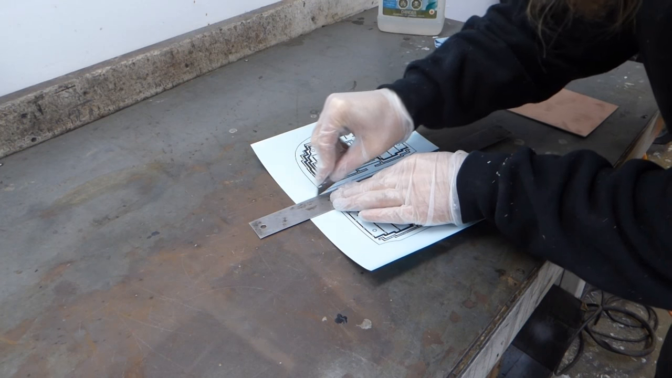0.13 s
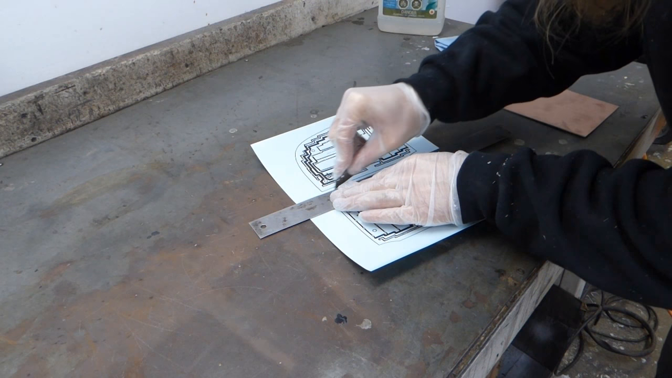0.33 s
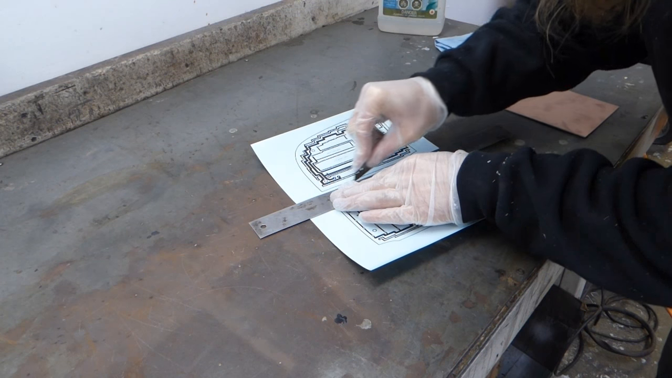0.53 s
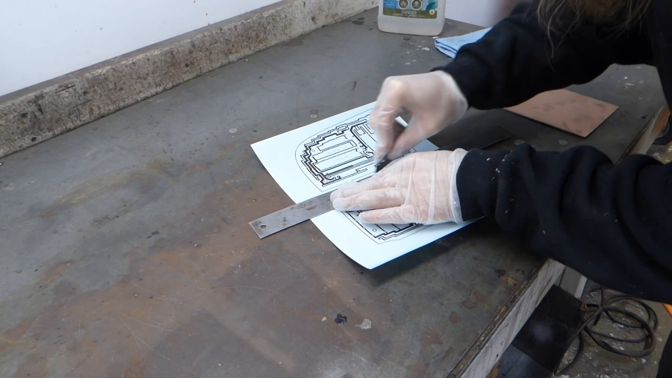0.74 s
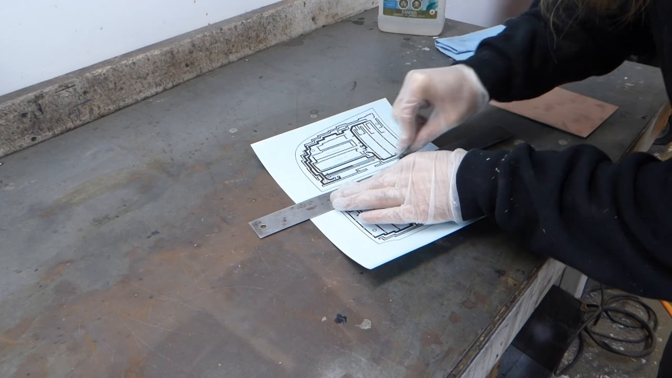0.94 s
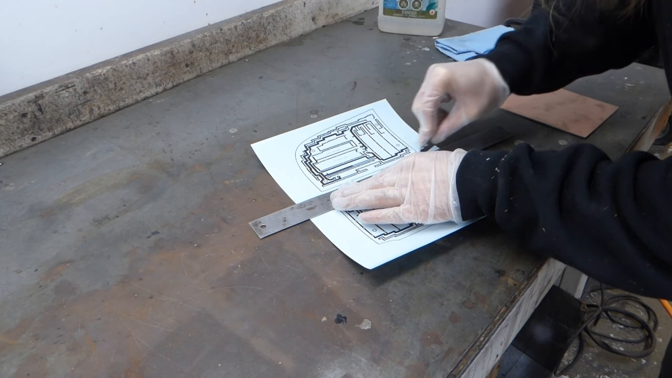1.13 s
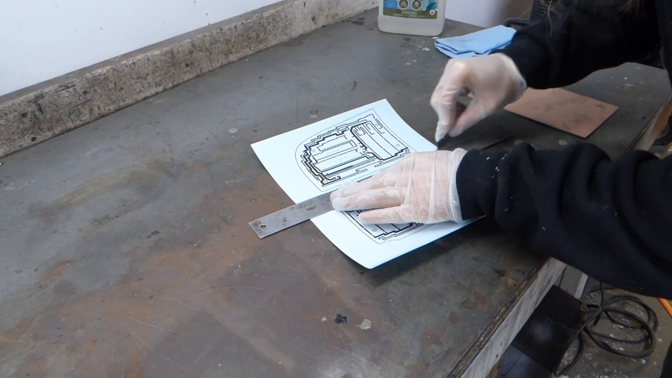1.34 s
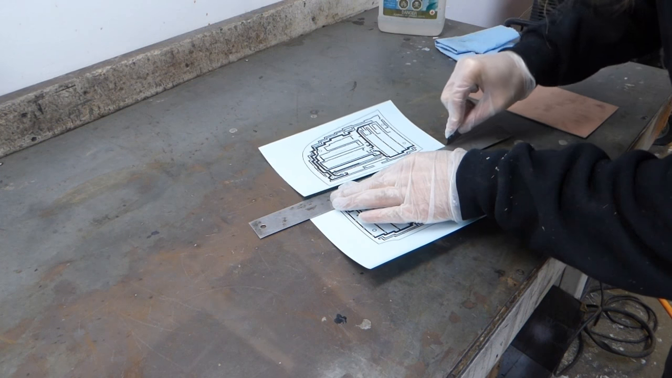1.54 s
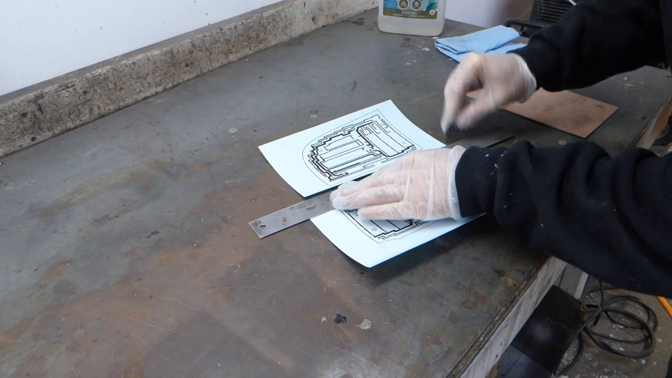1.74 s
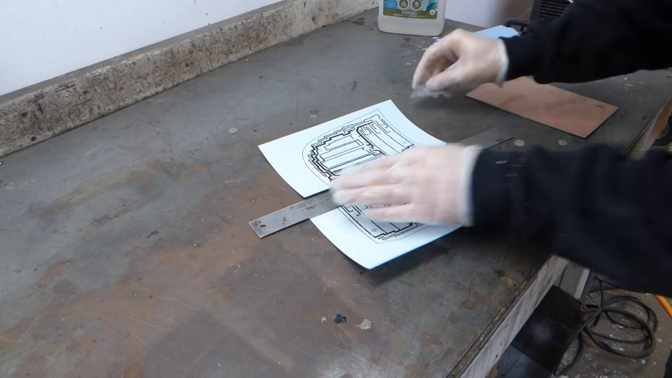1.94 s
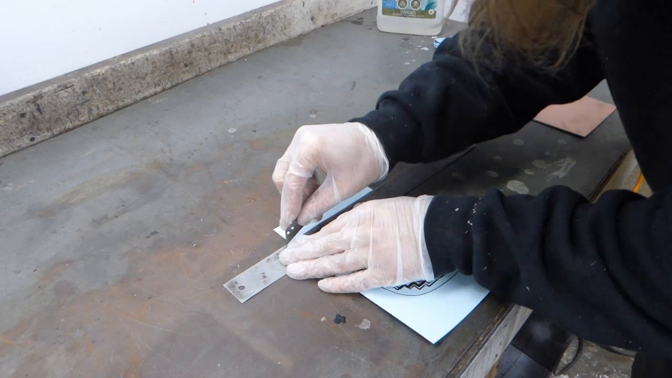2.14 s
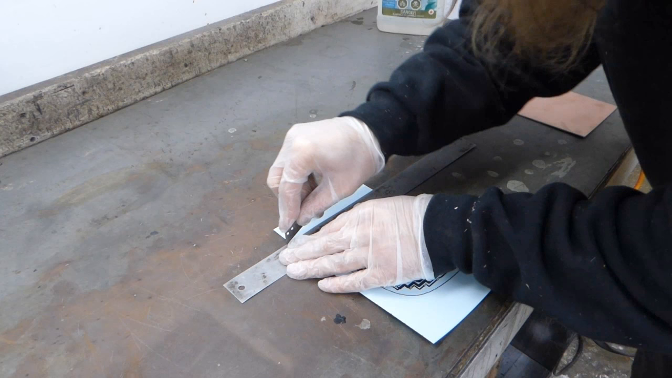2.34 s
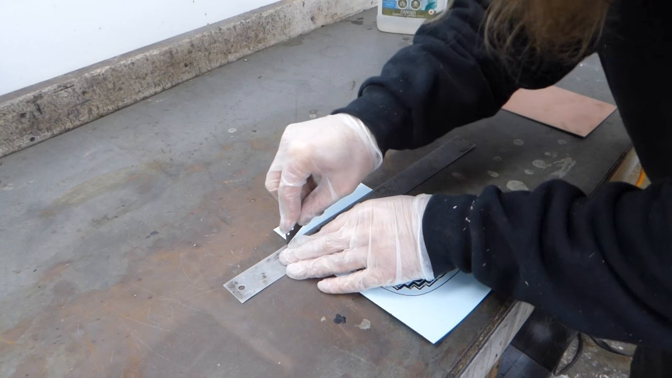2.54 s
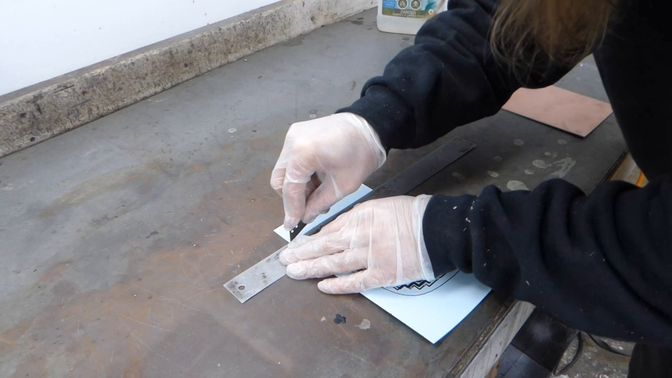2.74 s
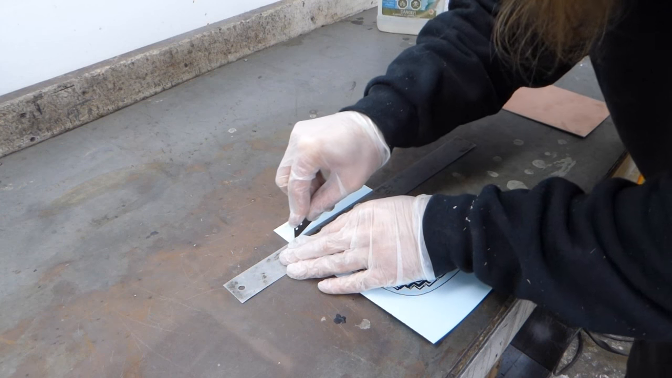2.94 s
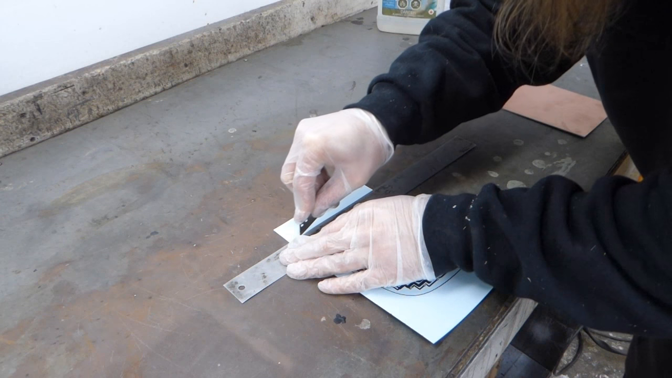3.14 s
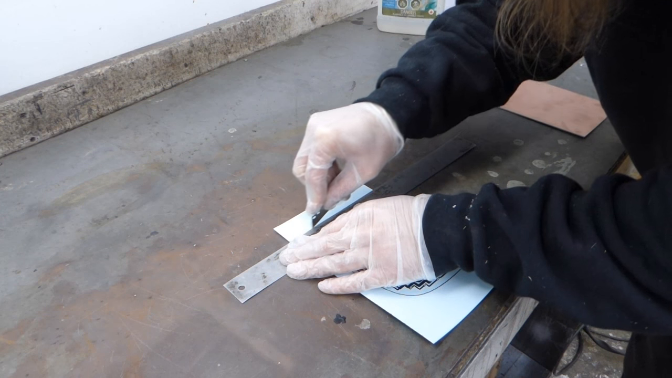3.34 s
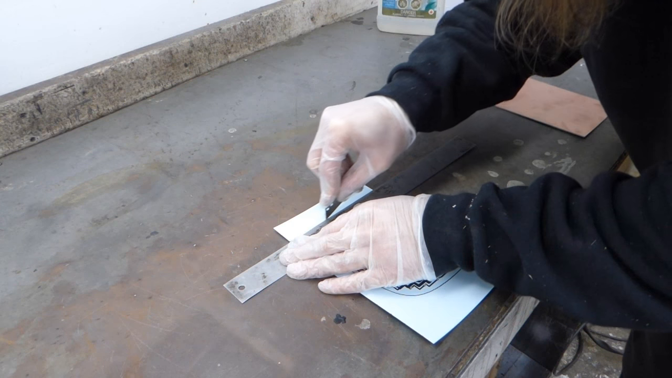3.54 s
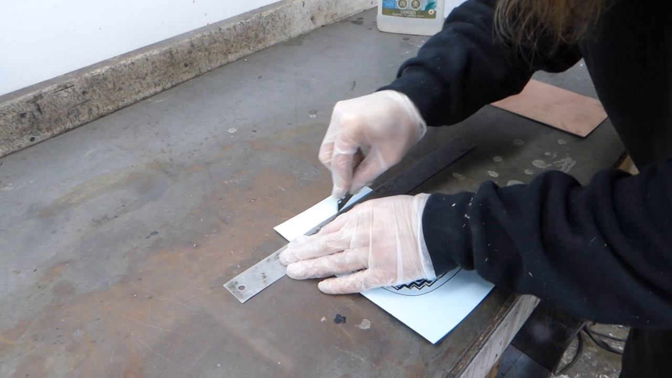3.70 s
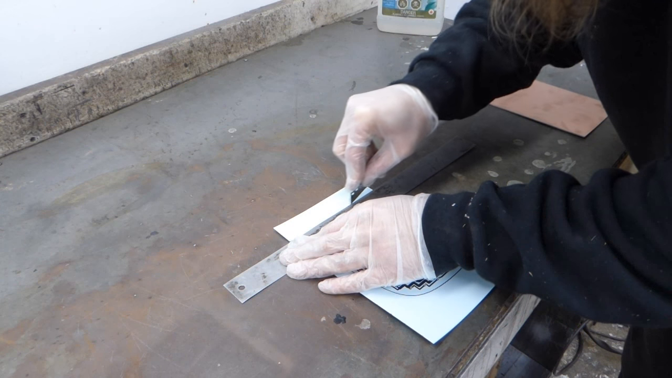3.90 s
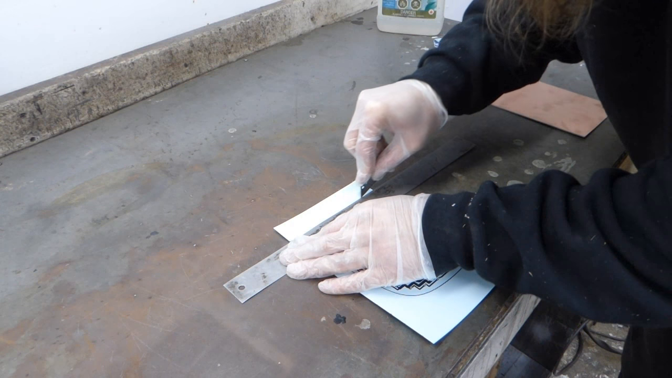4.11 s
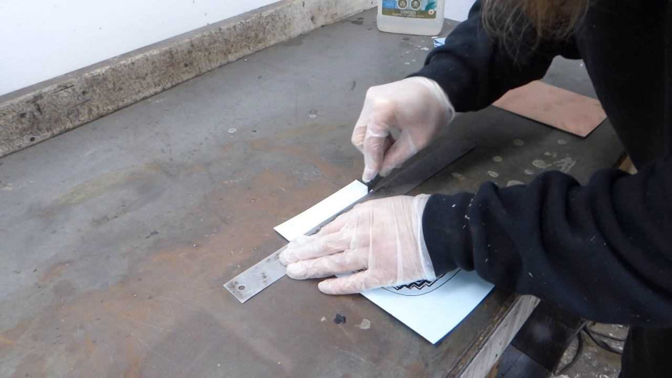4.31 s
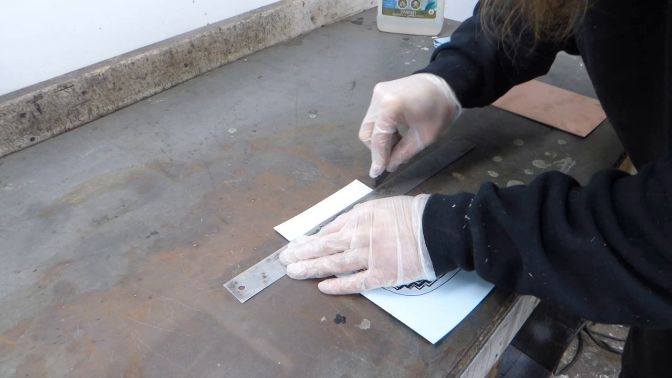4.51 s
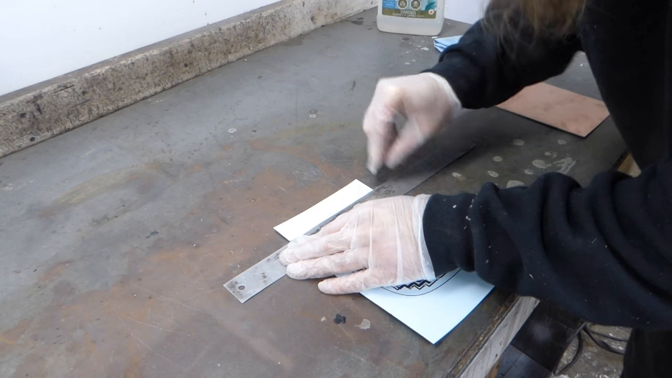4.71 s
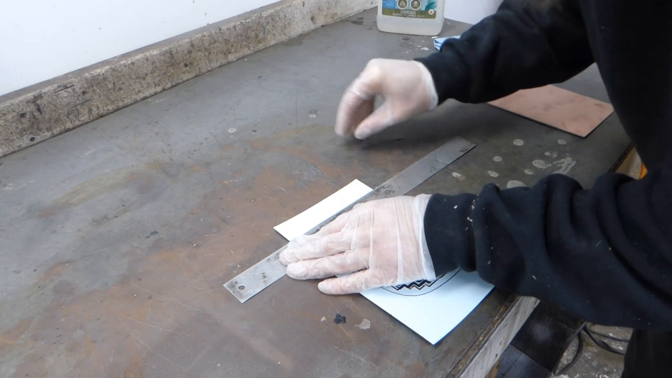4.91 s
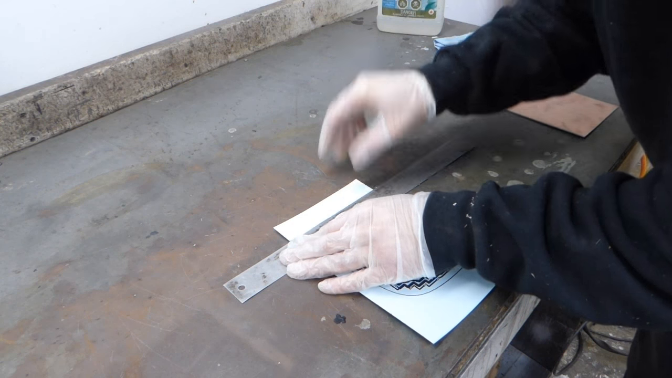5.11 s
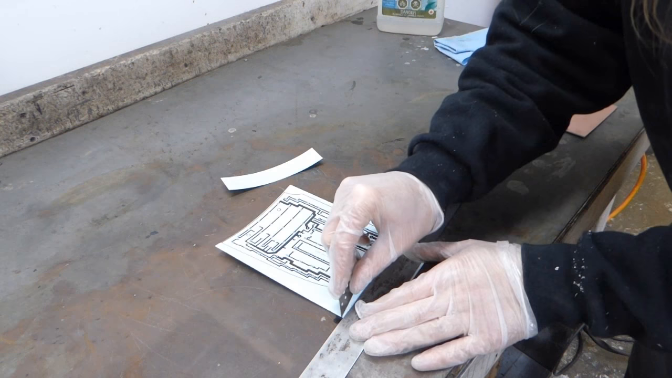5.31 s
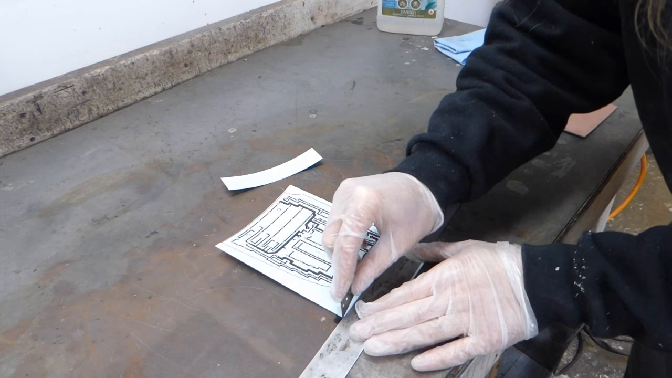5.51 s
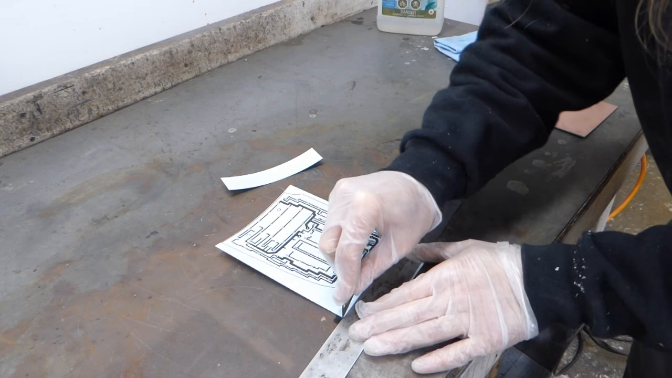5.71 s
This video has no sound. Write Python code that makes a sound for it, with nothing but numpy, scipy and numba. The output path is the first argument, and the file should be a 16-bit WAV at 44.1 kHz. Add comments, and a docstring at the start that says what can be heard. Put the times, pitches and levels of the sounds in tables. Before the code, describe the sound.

Two long rasping cuts of a knife against a metal ruler, a few handling ticks between them, and a crisp metallic tap near the end.

```python
"""Blade along a steel ruler

A blade is drawn along a steel ruler through paper on a workshop bench.
Its random slips ring the bench modes, make the sheet sing and are filtered into fibre hiss; noise bursts click,
and brief tones squeak high or sound once low and dull; the dropped blade gives a sharp tap of quick ticks and rings.
The bare room answers with a decaying noise tail, over a faint hiss. The close sound breaks off and restarts thrice.
"""
import sys
import numpy as np
from scipy import signal
from scipy.fft import rfft, irfft, next_fast_len
from scipy.io import wavfile
from scipy.ndimage import uniform_filter1d
from numba import njit

SR = 44100
rng = np.random.default_rng(int(sys.argv[2]) if len(sys.argv) > 2 else 0)


def dump_mix(stems):
    """Bounce the given channels to the path in sys.argv[1] as a 16-bit WAV at rate SR."""
    frames = np.atleast_2d(stems).T  # one column per channel
    limited = np.clip(frames, -1, 1)  # hard clip at full scale
    pcm = np.round(limited * 32767).astype(np.int16)
    wavfile.write(sys.argv[1], SR, pcm)


N = 258205  # length in samples


def undb(db):
    """Decibels to gain."""
    return 10 ** (np.asarray(db) / 20)


def unit(x):
    """Scale to rms 1."""
    return x / np.sqrt(np.mean(x ** 2))


def across(table, size):
    """A (Hz, value) table read at every bin of a transform."""
    hz, value = np.transpose([row for row in table if row[0] > 0])
    bins_hz = np.fft.rfftfreq(size, 1 / SR)
    return np.interp(np.log(bins_hz + 1), np.log(hz), value)


def colour(x, table):
    """Filter a sound by a (Hz, dB) curve."""
    length = x.shape[-1]
    size = next_fast_len(length)
    return irfft(rfft(x, size) * undb(across(table, size)), size)[..., :length]


@njit
def band(x, hz, width):
    """State-variable band-pass whose centre may move; gain 1 at the centre."""
    y, b, l = np.empty(len(x)), 0., 0.
    for i in range(len(x)):
        g, k = np.tan(np.pi * hz[i] / SR), width / hz[i]
        v = (b + g * (x[i] + 1e-18 - l)) / (1 + g * (g + k))
        b, l, y[i] = 2 * v - b, l + 2 * g * v, k * v
    return y


def fixed_band(x, hz, width_hz):
    """Band-pass with a steady centre."""
    return band(x, np.full(len(x), 1. * hz), 1. * max(width_hz, 5))


def walk(rate):
    """Random levels held 1 / rate s and slewed twice, at rms near 1."""
    hold = int(SR / rate)
    steps = np.repeat(rng.standard_normal(N // hold + 1), hold)
    return unit(uniform_filter1d(uniform_filter1d(steps, hold), hold)[:N])


def add(out, s, sound, pan_db):
    """Mix a short sound in at time s; pan_db is left minus right."""
    i = int(s * SR)
    sound = sound[:N - i]
    out[:, i:i + len(sound)] += sound * undb(np.array([[pan_db], [-pan_db]]) / 2)


def ring(push, modes):
    """A body rings in its (Hz, width, dB) modes; neighbours move in opposite sense."""
    out = 0
    for k, (hz, width, db) in enumerate(modes):
        out = out + (-1) ** k * undb(db) * fixed_band(push, hz, width) / np.sqrt(width)
    return out


RULER_DRIFT = .012  # share by which each mode wanders as the grip shifts


def patchy_ring(push, modes, pitch, patchy_db):
    """Modes scaled by a pitch factor that wander, and swell or fade one by one."""
    out = 0
    for k, (hz, width, db) in enumerate(modes):
        level = undb(db + patchy_db * walk(8))
        centre_hz = hz * pitch * (1 + RULER_DRIFT * walk(4))
        out = out + (-1) ** k * level * band(push, centre_hz, 1. * width) / np.sqrt(width)
    return out


def slips(rate, scatter_db, grip_db):
    """Tiny random slips of uneven size, rate per second; the grip wavers quickly."""
    happens = rng.random(N) < rate / SR
    size, scatter = rng.standard_normal((2, N))
    return unit(happens * size * undb(scatter_db * scatter + grip_db * walk(45)))


# the two long cuts, each a list of breakpoints; the rumble follows the pressure, the hiss the speed
# columns: time_s, rumble_db, hiss_db
CUTS = [
    [(0.0, -45, -56.5), (0.206, -40.5, -44), (0.392, -45.5, -47.5), (0.55, -40.5, -43.5), (0.718, -42, -47),
     (0.952, -42.5, -44), (1.076, -38, -46), (1.096, -42.5, -46.5), (1.148, -40, -42), (1.442, -45, -49),
     (1.46, -44.5, -47), (1.546, -45, -50), (1.69, -87, -99), (1.72, -105, -104)],
    [(3.0, -55, -70), (3.136, -41, -56.5), (3.14, -39, -46.5), (3.178, -42.5, -55.5), (3.43, -37.5, -46.5),
     (3.524, -41, -53.5), (3.536, -43.5, -52.5), (3.778, -38.5, -47), (3.886, -41.5, -49),
     (4.0, -35, -47.5), (4.252, -42.5, -56), (4.392, -43, -52.5), (4.508, -51.5, -60.5), (4.53, -44, -53)],
]
# deep rumble of each cut relative to its rumble; column: deep_re_rumble_db
CUT_DEEP_DB = [-9, -9]
# short shoves of hand, sheet and ruler
# columns: full_level_s, held_s, rumble_db, hiss_db, deep_re_rumble_db
SHOVES = [(1.753, 0.013, -58, -52, -13), (2.06, 0.0092, -71, -53.5, 0), (1.9, 0.0083, -75, -58.5, 3),
          (1.946, 0.028, -57.5, -55.5, -2.5), (2.61, 0.056, -41.5, -58, -4.5),
          (2.845, 0.0062, -43.5, -65, -9), (2.9, 0.062, -48, -58.5, -3.5), (4.546, 0.064, -36, -55.5, -15),
          (4.749, 0.075, -62, -57, -30), (5.2, .08, -45.5, -57.5, -0.5)]
SHOVE_RISE_DB_S, SHOVE_FALL_DB_S = 318.5, 193  # slopes in dB per second


def movements(t):
    """Each cut and shove as curves of rumble, hiss and deep rumble in dB; no shove lasts across a break."""
    for cut, deep_db in zip(CUTS, CUT_DEEP_DB):
        s, rumble_db, hiss_db = np.transpose(cut)
        rumble_db = np.interp(t, s, rumble_db, -200, -200)
        yield rumble_db, np.interp(t, s, hiss_db, -200, -200), rumble_db + deep_db
    for s, held_s, rumble_db, hiss_db, deep_db in SHOVES:
        rise_db = -SHOVE_RISE_DB_S * np.maximum(s - t, 0)
        fall_db = -SHOVE_FALL_DB_S * np.maximum(t - s - held_s, 0)
        same_stretch = np.digitize(t, BREAKS) == np.digitize(s, BREAKS)
        shape = np.where(same_stretch, rise_db + fall_db, -200)
        yield shape + rumble_db, shape + hiss_db, shape + rumble_db + deep_db


# two sheet notes that sink as the slit grows in the first cut, level relative to the hiss
# columns: time_s, level_re_hiss_db
SONG = [(0, -11), (.25, -1.5), (.45, -3.5), (.75, 7), (1.1, 1.5), (1.35, 2.5), (1.5, -20), (1.6, -35)]
# sheet resonances lit in turn as the notes sink past; columns: pitch_hz, width_hz, relative_level_db
SHEET_MODES = [(1900, 100, 1), (2100, 80, 2), (2350, 60, 3), (2630, 50, 7), (2800, 50, 0), (3250, 90, -1),
               (3520, 90, -1), (3700, 120, -3), (3950, 90, -3), (4200, 70, 0), (4450, 93, 1)]
SONG_HZ, SONG_SINK_HZ_S, SHEET_WIDTH_HZ = 3050, 680, 390.
OVERTONE_HZ, OVERTONE_SINK_HZ_S, SHEET_OVERTONE_WIDTH_HZ = 4550, 1050, 1300.
SHEET_OVERTONE_DB, SHEET_MODES_DB = -4, -10


def sheet_song(grit, t):
    """Slips drive two sinking resonances of the sheet, which in turn ring its fixed modes."""
    flex = 1 + 0.008 * walk(15)  # the sheet flexes, so the lower note wavers
    low_hz = np.maximum(SONG_HZ - SONG_SINK_HZ_S * t, 1000) * flex
    high_hz = np.maximum(OVERTONE_HZ - OVERTONE_SINK_HZ_S * t, 1000)
    low = unit(band(grit, low_hz, SHEET_WIDTH_HZ))
    high = band(grit, high_hz, SHEET_OVERTONE_WIDTH_HZ)
    high = unit(band(high, high_hz, SHEET_OVERTONE_WIDTH_HZ))
    song = unit(low + undb(SHEET_OVERTONE_DB) * high)
    return unit(song + undb(SHEET_MODES_DB) * unit(ring(song, SHEET_MODES)))


# bench top resonances; columns: pitch_hz, width_hz, relative_level_db
BENCH = [(230.6, 21.6, 0.5), (269.3, 37.6, 2), (304.5, 22, 3.5), (375.4, 19, -1.5), (413.2, 17, 3.5),
         (496, 64, 2), (568.6, 18, 1), (612.8, 13, -3), (687.3, 42, 3), (759, 72, -3.5), (866, 47, -5),
         (1020, 57, -36), (1290, 860, -9.5)]
# deep bench resonances, loud when the hand leans hard; columns: pitch_hz, width_hz, relative_level_db
BENCH_DEEP = [(60.7, 185, -23), (135.5, 30, -21), (170.8, 28, -3), (207, 34, -5.5)]
# spectrum of the rustling sheet; columns: pitch_hz, relative_level_per_hz_db
RUSTLE = [(530, -25.5), (900, 1.5), (1140, -2), (1310, -2.5), (1380, -5), (2330, -17.5), (6000, -23),
          (7800, -35), (13200, -120)]
# resonances of the rustling sheet; columns: pitch_hz, width_hz, relative_level_db
RUSTLE_MODES = [(878, 100, 4.5), (1103, 44, 4.5), (1277, 59, -3), (1705, 53, -6)]
# spectrum of the tearing fibres; columns: pitch_hz, relative_level_per_hz_db
FIBRES = [(2650, -7.5), (4500, -2.5), (5120, -6.5), (7050, 0), (8020, -2.5), (9710, -0.5), (13000, -17),
          (14700, -23), (15400, -33)]
# steel ruler under the scraping blade; columns: pitch_hz, width_hz, relative_level_db
RULER = [(5650, 300, -4), (6500, 120, 3), (7080, 160, 4), (7520, 120, -1), (8100, 150, -2), (8600, 200, 1),
         (9220, 150, -3), (9780, 150, -3)]
# ruler pitch in each stretch between breaks, as the hand holds it elsewhere; column: pitch_factor
RULER_PITCH = [1, .975, 1, 1]
# the contact shifts as the blade travels
# columns: time_s, upper_minus_lower_bench_db, rustle_change_db, ruler_change_db
TRAVEL = [(0, -2, -6, -15), (.2, -0.5, 4.5, -22), (.45, 5.5, -12.5, -13), (.62, 6, 1, -0.5),
          (.72, -1.5, 1.5, 1.5), (1.0, -9, 0.5, 1.5), (1.22, -5, 2.5, -0.5), (1.4, -11, 0.5, -8),
          (1.52, 2.5, 2, -21), (1.75, 9, 2.5, -20), (2.6, 6.5, -3, -7.5), (2.9, -4.5, 4.5, -14),
          (3.1, -4, 3, -6), (3.35, -1.5, -2.5, 1), (3.48, 1.5, 11.5, 6), (3.58, -0.5, 1.5, 2),
          (3.82, -1, 5.5, -4), (4.0, -1.5, -1, 1.5), (4.12, -3.5, 2, -14.5), (4.3, -6, -1, -22),
          (4.55, -3.5, 4.5, -19), (5.2, -12, -0.5, -8)]
BENCH_SPLIT_HZ = 340
UNSTEADY_DB, DEEP_UNSTEADY_DB = -0.3, 2.5  # the hand never leans evenly
RUSTLE_DB, RUSTLE_PRESSURE_SHARE = -10, 0.29  # the sheet rustles with both pressure and speed
RUSTLE_MODES_DB, RULER_DB = -5, -8
RULER_PATCHY_DB, RUSTLE_PATCHY_DB = 4.5, 4  # each mode comes and goes on its own
FLUTTER_DB = -1.42


def cutting():
    """Slips shake bench, sheet and tearing fibres; gives two pushes on the bench and airborne sound."""
    t = np.arange(N) / SR
    press, speed, lean = sum(undb(move) for move in movements(t))
    time_s, *shifts = np.transpose(TRAVEL)
    upper_db, rustle_db, ruler_db = (np.interp(t, time_s, column) for column in shifts)

    grit = slips(9000, 1.5, .8)
    singing = speed * undb(np.interp(t, *np.transpose(SONG), right=-200))
    song = singing * sheet_song(grit, t)

    rustling = undb(RUSTLE_DB + rustle_db) * press ** RUSTLE_PRESSURE_SHARE * speed ** (1 - RUSTLE_PRESSURE_SHARE)
    rustle_ring = unit(patchy_ring(grit, RUSTLE_MODES, np.ones(N), RUSTLE_PATCHY_DB))
    rustle = rustling * (unit(colour(grit, RUSTLE)) + undb(RUSTLE_MODES_DB) * rustle_ring)

    ruler_pitch = np.take(RULER_PITCH, np.digitize(t, BREAKS))
    ruler_ring = unit(patchy_ring(grit, RULER, ruler_pitch, RULER_PATCHY_DB))
    tearing = unit(colour(grit, FIBRES)) + undb(RULER_DB + ruler_db) * ruler_ring
    paper = (song + rustle + speed * unit(tearing)) * undb(FLUTTER_DB * walk(16))

    drag = slips(4500, 2, 1.3)
    # scale each push so that its modes ring at level 1
    rumble, deep = (drag / np.std(ring(drag, modes)) for modes in (BENCH, BENCH_DEEP))
    split = signal.butter(2, BENCH_SPLIT_HZ, "high", fs=SR, output="sos")
    upper = signal.sosfiltfilt(split, rumble)
    rumble = (rumble - upper) * undb(-upper_db / 2) + upper * undb(upper_db / 2)
    rumble = rumble * undb(UNSTEADY_DB * walk(23))
    deep = deep * undb(DEEP_UNSTEADY_DB * walk(20))
    return press * rumble, lean * deep, paper


def burst(length_ms):
    """A quick rattle that falls about 20 dB within its length, cut off at 46 ms."""
    t = np.arange(2048) / SR / (max(length_ms, .3) / 1000)
    return rng.standard_normal(2048) * np.minimum(t / 0.041, 1) * np.exp(-2.3 * t ** 1.1)


def blow(out, s, db, length_ms, pan_db, tint):
    """Add a coloured rattle as heard directly; gives back its size."""
    sound = tint(burst(length_ms))
    sound = undb(db) * sound / np.abs(sound).max()
    add(out, s, sound, pan_db)
    return np.linalg.norm(sound)


def knock(out, s, size, tint):
    """Add one evenly coloured push: a rattle as blade and walls get it, averaged over all sides."""
    even = tint(signal.unit_impulse(2048, 128))
    add(out, s, size * even / np.linalg.norm(even), 0)


def thump(out, s, db, length_ms):
    """Add a push on the bench, scaled by the peak of the ringing it causes."""
    push = burst(length_ms)
    add(out, s, undb(db) * push / np.abs(ring(push, BENCH)).max(), 0)


# small clicks; columns: start_s, peak_db, colour_hz, length_ms, thump_re_peak_db
CLICKS = [(0.588, -26, 3480, 17, -9), (1.4584, -32, 3520, 13, -28), (1.7355, -54, 3010, 6.4, -38),
          (1.7483, -44, 3080, 7.5, -16), (1.752, -59, 640, 22, -11), (1.7590, -32.5, 4020, 4, -25),
          (1.9369, -37.5, 3000, 11, -9), (1.945, -37, 2440, 15, -5.5), (2.0552, -30, 3800, 9, -13),
          (2.0631, -33, 8000, 14, -30), (2.0640, -35.5, 700, 6.8, -17), (2.0733, -33, 2300, 10, -37),
          (2.0812, -27.5, 4650, 3.1, -39), (2.098, -38, 3000, 5.9, -26), (2.119, -42, 2300, 10, -24),
          (2.13, -44, 5800, 12, -25), (2.373, -34.5, 5000, 18, -14), (2.3926, -44, 6300, 13, -16),
          (2.536, -48.5, 5170, 5.5, -5), (2.6776, -45, 3210, 12, 9), (2.851, -43.5, 6770, 11, 5),
          (2.8899, -31, 2840, 13.6, -4), (2.9165, -40, 2160, 14, 2), (3.083, -44.5, 6820, 8.8, 7.5),
          (3.14, -37, 6000, 14, -16), (3.988, -32, 5060, 10, -22), (4.096, -37, 7170, 17, -13),
          (4.1284, -47.5, 7220, 5, 16), (4.1683, -38, 3270, 21, -20), (4.2772, -32.5, 3410, 7.4, 4),
          (4.5192, -45, 4500, 13, -10.5), (4.745, -32, 9000, 14, -10), (5.2, -44.5, 4000, 8.1, 1),
          (5.229, -40.5, 7700, 20, -26), (5.252, -45, 8540, 7.7, -15), (5.268, -49, 5180, 8, -8),
          (5.3435, -52, 5960, 9.2, -6), (5.47, -54, 4190, 8, -11)]
CLICK_WIDTH, CLICK_PAN_DB, CLICK_TOP_HZ = 1.86, 0.5, 10500  # width as a multiple of the colour pitch


def clicks(thumps, direct, ticks):
    """Short rattles in a wide band, each with a thump on the bench."""
    dull = signal.butter(4, CLICK_TOP_HZ, fs=SR, output="sos")
    for s, db, hz, length_ms, thump_db in CLICKS:
        width = hz * CLICK_WIDTH
        tint = lambda x: signal.sosfilt(dull, fixed_band(fixed_band(x, hz, width), hz, width))
        knock(ticks, s, blow(direct, s, db, length_ms, CLICK_PAN_DB, tint), tint)
        thump(thumps, s, db + thump_db, length_ms)


# a sharp tap: a faint soft onset, then a quick volley of bright ticks and weaker bounces; levels before TAP_DB
# columns: start_s, relative_peak_db, length_ms, left_minus_right_db
TAP = [(4.9192, -22, 3, 1), (4.9208, -3.5, 2, 0), (4.9221, -5, 2, 1), (4.9235, -3.5, 2, 6),
       (4.9256, -8, 2.5, 6), (4.9272, -10, 2.5, 6), (4.9365, -22, 4, 3), (4.9465, -23, 4, 3),
       (4.9730, -25, 5, 3), (4.9890, -28, 5, 3), (4.9575, -20, 6, 3)]
# spectrum of the tap; columns: pitch_hz, relative_level_db
TAP_COLOUR = [(300, -22), (650, -21), (950, -17), (1400, -20), (2200, -13.5), (4770, -10), (7970, -3),
              (12500, -8), (13200, -16), (15500, -24)]
# how much fuller the tap is averaged over all sides than direct; columns: pitch_hz, boost_db
TAP_SPREAD = [(300, 4), (700, 8), (1400, 8), (2500, 2), (6000, 0), (12500, 0), (14000, 4)]
TAP_DB, TAP_LOW_HZ = -1, 350
TAP_THUMP_DB, TAP_THUMP_MS = -32, 94
BOUNCE_RING_DB = 6.5  # the late bounce catches the blade's edge


def dropped_blade_tap(thumps, direct, tap):
    """A faint onset, bright ticks, weaker bounces and one bench thump; two pushes excite the steel."""
    thin = signal.butter(3, TAP_LOW_HZ, "high", fs=SR, output="sos")
    tint = lambda x: signal.sosfilt(thin, colour(x, TAP_COLOUR))
    spread = lambda x: colour(tint(x), TAP_SPREAD)
    thump(thumps, TAP[5][0], TAP_THUMP_DB, TAP_THUMP_MS)
    sizes = [blow(direct, s, db + TAP_DB, length_ms, pan_db, tint) for s, db, length_ms, pan_db in TAP]
    # one push with the energy of the whole tap, one for the late bounce
    knock(tap, TAP[1][0], np.linalg.norm(sizes), spread)
    knock(tap, TAP[-1][0], undb(BOUNCE_RING_DB) * sizes[-1], tint)


CLICK_RING_DB, CLICK_ROOM_DB, TAP_ROOM_DB = -6.5, 1, 2.5


def clicks_and_tap():
    """Clicks and tap together: bench thumps, direct rattles, what rings the blade, what reaches the walls."""
    thumps, direct, ticks, tap = np.zeros((4, 2, N))
    clicks(thumps, direct, ticks)
    dropped_blade_tap(thumps, direct, tap)
    strikes = undb(CLICK_RING_DB) * ticks + tap
    wall = undb(CLICK_ROOM_DB) * ticks + undb(TAP_ROOM_DB) * tap
    return thumps[0], direct, strikes, wall[0]


# brief unsteady tones: high squeaks and one low, dull tone; levels before TONE_DB
# columns: start_s, length_ms, pitch_hz, relative_level_db, wall_send_db
BRIEF_TONES = [(1.737, 22, 3050, -43, -3), (1.738, 15, 4600, -47, -1), (1.747, 32, 630, -39, -5),
               (1.754, 14, 3000, -35, -5), (1.758, 16, 2800, -39, -1), (1.944, 10, 3000, -43, -4),
               (1.944, 12, 2550, -42, -4), (2.055, 22, 6150, -35, -2), (2.072, 12, 2150, -44, 0),
               (2.073, 16, 4650, -40, -3), (2.058, 15, 11690, -38, -20), (2.0600, 12, 13450, -46, -20),
               (2.0615, 12, 8380, -27, -22)]
TONE_DB = -4
TONE_ROUGH = .12  # radians by which the tone's phase strays each sample


def brief_tones():
    """Sines of straying phase that swell and stop, direct and as sent to the walls."""
    out, wall = np.zeros((2, 2, N))
    for s, length_ms, hz, db, room_db in BRIEF_TONES:
        t = np.arange(int(length_ms * SR / 1000)) / SR
        waver = np.cumsum(rng.standard_normal(2048))[:len(t)]
        swell = np.abs(np.sin(np.pi * t / t[-1])) ** 0.18
        tone = undb(db + TONE_DB) * swell * np.sin(2 * np.pi * hz * t + TONE_ROUGH * waver)
        add(out, s, tone, 0)
        add(wall, s, undb(room_db) * tone, 0)
    return out, wall[0]


# blade resonances, levels before BLADE_DB; columns: pitch_hz, relative_level_db, t60_s
BLADE = [(710, -14, .25), (950, 3, 0.03), (2400, -14, .35), (3100, -2, .03), (5800, -6, .1), (6225, 0, 0.2),
         (6820, -13, .3), (7100, 3, .04), (8420, -9, .2), (9500, 6, .035), (9980, -12, .25),
         (11690, -4, .15), (12400, 1, .02), (13380, -2, .2), (13800, -3, .16), (14380, 0, .15)]
BLADE_DB = -40


def blade(blows):
    """Each blow leaves the thin steel ringing in decaying sine modes."""
    out = 0
    for hz, db, t60 in BLADE:
        pole = np.exp(2j * np.pi * hz / SR - np.log(1000) / (t60 * SR))
        out = out + undb(db + BLADE_DB) * signal.lfilter([1], [1, -pole], blows).imag
    return out


# room decay by band; columns: pitch_hz, t60_s, left_right_correlation (no unit)
ROOM = [(135, 0.49, 1), (221, 0.74, 1), (470, 0.72, 1), (1170, 0.5, 0.05), (2300, 0.84, 0.83),
        (3850, 0.55, 0.067), (7860, 0.22, 0.061), (13700, 0.31, 0.047)]
ROOM_DB, ROOM_GAP_MS = -6, 1.22  # the tail swells in over the gap


def room():
    """Diffuse tail: wide bands of noise, each fading at its own rate and partly alike left and right."""
    t, tail = np.arange(SR) / SR, 0
    for hz, t60, like in ROOM:
        mid, side = (fixed_band(rng.standard_normal(SR), hz, hz) for _ in range(2))
        both = np.sqrt(1 + like) * mid + np.sqrt(1 - like) * side * np.array([[1], [-1]])
        tail = tail + both * 1000 ** (-t / t60) / (hz / 1000) ** 0.0074
    tail = tail * np.clip(t * 1000 / ROOM_GAP_MS, 0, 1) ** 2
    tail = tail * undb(4.3 * np.exp(-t / 0.099))  # near walls crowd the first echoes
    return undb(ROOM_DB) * tail / np.sqrt(np.sum(tail ** 2) / 2)


# hiss spectrum common to both channels; columns: pitch_hz, relative_level_per_hz_db
HISS = [(15, -53), (25, -24), (55, -24), (266, -10), (305, -10), (388, -13.5), (740, -15.5), (1020, -18.5),
        (1410, -19.5), (2290, -23), (15400, -29.5)]
# hiss spectrum added left and subtracted right; columns: pitch_hz, relative_level_per_hz_db
HISS_SIDE = [(15, -45), (25, -8), (101, -23), (140, -10), (215, -14), (259, -4), (399, -21), (444, -3),
             (8320, -23), (12100, -26), (15400, -49)]
HISS_DB, HISS_SIDE_DB = -61.5, -59.5


def hiss():
    """Faint steady background of coloured noise with a slight sway, wide between the channels."""
    mid = undb(HISS_DB) * unit(colour(rng.standard_normal(N), HISS))
    side = undb(HISS_SIDE_DB) * unit(colour(rng.standard_normal(N), HISS_SIDE))
    return undb(.5 * walk(29)) * (mid + side * np.array([[1], [-1]]))


# instants where the close sound breaks off and restarts, so no ringing carries over; column: time_s
BREAKS = [2.597, 5.197, 5.277]
# stereo lean of everything but the hiss; columns: pitch_hz, left_minus_right_db
LEFT_LEAN = [(300, 0), (1500, 1), (6000, 1.5), (13000, 1.5)]
LEAD_S = .4  # each stretch starts with its movement already under way
FADE_S = .004  # fade at both ends of each stretch


def scene():
    """All sources, rung through bench, blade and room between one break and the next, over the hiss."""
    drag, deep, paper = cutting()
    thumps, blows, strikes, wall = clicks_and_tap()
    tones, tones_wall = brief_tones()
    tail, parts, lead = room(), [], int(LEAD_S * SR)
    for a, b in zip([0] + BREAKS, BREAKS + [N / SR]):
        span = slice(round(a * SR), round(b * SR))
        # a mirrored lead-in lets bench and room ring up before the stretch is heard
        pushes = (drag + thumps, deep + 0.3 * thumps, paper)
        bench_push, deep_push, airborne = [np.pad(x[span], (lead, 0), "reflect") for x in pushes]
        centre = ring(bench_push, BENCH) + ring(deep_push, BENCH_DEEP) + airborne
        steel = blade(strikes[:, span])
        sent = centre + np.pad((wall + tones_wall)[span] + steel.mean(axis=0), (lead, 0))
        wet = signal.fftconvolve(sent[None], tail, axes=1)[:, lead:len(sent)]
        edge = np.arange(span.stop - span.start) / (FADE_S * SR)
        fade = np.clip(np.minimum(edge, edge[::-1]), 0, 1)
        parts.append(fade * (centre[lead:] + (blows + tones)[:, span] + steel + wet))
    heard = np.concatenate(parts, axis=1)
    left, right = ([(hz, sign * db / 2) for hz, db in LEFT_LEAN] for sign in (1, -1))
    return np.array([colour(heard[0], left), colour(heard[1], right)]) + hiss()


TOP_HZ = 15300


def record(dry):
    """Cut the bass, round the loudest peaks by soft saturation and cut the very top."""
    low_cut = signal.butter(3, 65, "high", fs=SR, output="sos")
    top_cut = signal.ellip(10, .2, 80, TOP_HZ, fs=SR, output="sos")
    rounded = np.tanh(signal.sosfilt(low_cut, dry))
    return signal.sosfilt(top_cut, rounded)


dry = scene()
out = record(dry)
dump_mix(out)
```